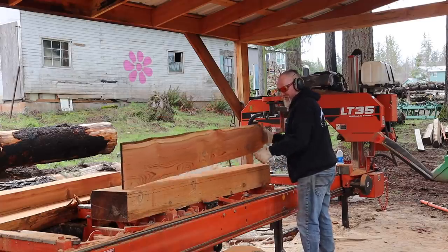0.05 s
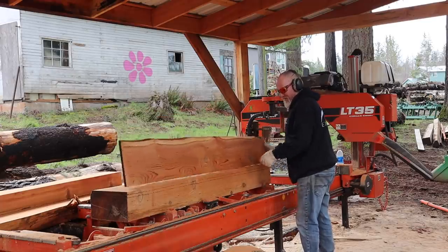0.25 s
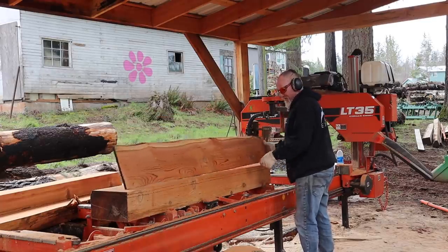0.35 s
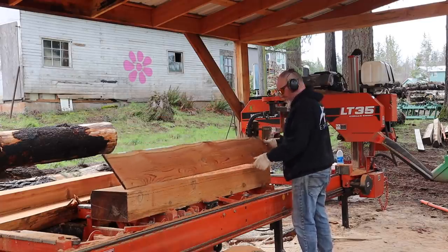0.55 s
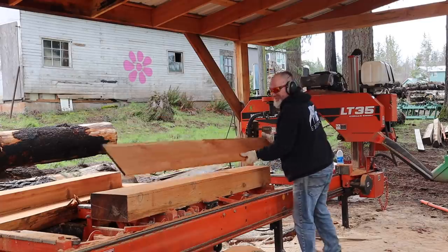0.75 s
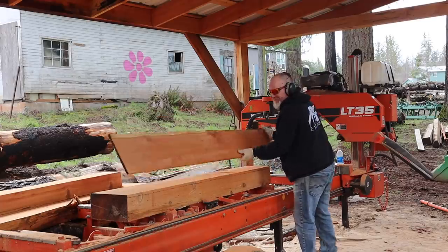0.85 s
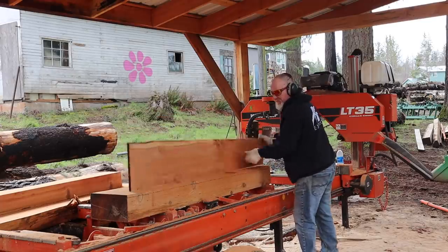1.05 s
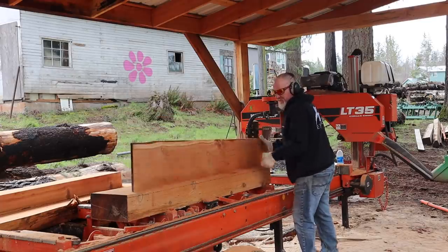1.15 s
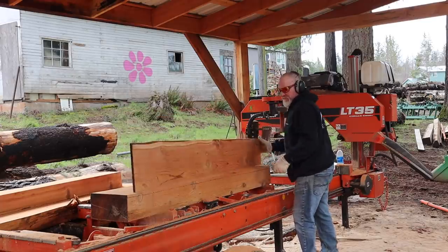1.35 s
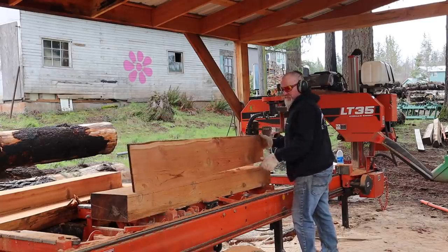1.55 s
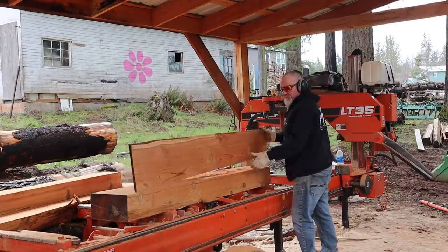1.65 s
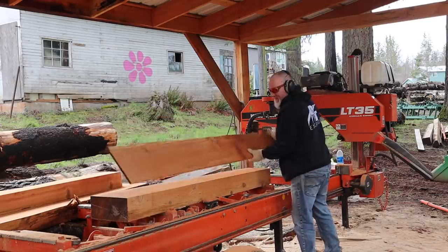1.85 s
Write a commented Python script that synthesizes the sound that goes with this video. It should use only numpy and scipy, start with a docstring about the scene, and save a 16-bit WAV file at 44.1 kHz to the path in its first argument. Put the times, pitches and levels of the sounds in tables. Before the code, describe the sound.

Two hard woody clunks of a thick board landing on timber, with scrapes and rumble between

```python
"""Under an open shed roof, a heavy plank is stood on edge twice on a squared log and shakes the steel bed.
Contact pulses ring the plank's modes, with noise cracks and a diffuse rumble that dies away by frequency.
Gloves and wood scrape as shaped noise and grains; loose steel ticks in noise bands and pings in decaying sines.
A dragging drone, a thin bird twitter, outdoor air and a far wavering hum are filtered noise and a drifting sine.
The loudest peaks clip."""
import sys
import numpy as np
from scipy import signal
from scipy.fft import rfft, irfft, next_fast_len
from scipy.io import wavfile
from scipy.ndimage import map_coordinates

SR = 44100
rng = np.random.default_rng(int(sys.argv[2]) if len(sys.argv) > 2 else 0)


def boost(x):
    """Linear amplitude factor 10**(x/20) for a level x in decibels (scalar or array-like)."""
    u = np.asarray(x, float) / 20
    return 10 ** u


def to_wav(s):
    """Save 16-bit WAV."""
    ch = np.atleast_2d(s).T  # columns
    pcm = np.round(np.clip(ch, -1, 1) * 32767)  # PCM
    wavfile.write(sys.argv[1], SR, pcm.astype(np.int16))


N = 83790  # length in samples


def unit(x):
    """Scale to rms 1."""
    return x / np.sqrt(np.mean(x ** 2) + 1e-20)


def along(points, hz):
    """Interpolate (Hz, value) points on a log frequency axis."""
    f, value = np.transpose(points)
    return np.interp(np.log(hz + 1), np.log(f + 1), value)


def wobble(rate):
    """A smooth random curve with rate knots a second."""
    knots = rng.standard_normal(int(N * rate / SR) + 4)
    return map_coordinates(knots, [np.arange(N) * rate / SR])


def filtered(x, response):
    """Filter x by a response given as a function of frequency."""
    size = next_fast_len(len(x) + 8192)
    spectrum = rfft(x, size) * response(np.fft.rfftfreq(size, 1 / SR))
    return irfft(spectrum, size)[:len(x)]


def narrow(hz, width_hz):
    """Noise in one resonance at rms 1; amplitude is halved at the edges of its width."""
    noise = rng.standard_normal(N)
    return unit(filtered(noise, lambda f: 1 / (1 + (2 * (f - hz) / width_hz) ** 2)))


def stroke(rows):
    """Gain along a (seconds, dB) curve, fading in and out in 4 ms."""
    s, db = np.transpose(rows)
    t = np.arange(N) / SR
    fade = np.clip(np.minimum(t - s[0], s[-1] - t) / .004, 0, 1)
    return boost(np.interp(t, s, db)) * fade


def add(x, s, part):
    """Mix part into x from time s in seconds."""
    seg = x[round(s * SR):][:len(part)]
    seg += part[:len(seg)]


# Contacts of plank and log. Each row: start in seconds, strength in dB before RING_DB, contact in ms,
# pitch factor as held, direction of the push (+1 or -1), crack in dB at its start before its low-pass.
KNOCKS = [(.2220, -20.5, 1.05, 1.08, 1, -47), (0.2243, -14.5, 0.47, 1.012, -1, -25.5),
          (0.2253, -15.5, 0.59, 1.04, -1, -45), (0.2273, -19.5, 0.73, 0.96, -1, -52),
          (0.311, -27.5, 1.9, 1.28, -1, -34), (.3593, -12, 3, .9, -1, -44),
          (0.3861, -17.5, 4.5, .95, -1, -56), (.469, -40, 1.6, .95, 1, -61),
          (1.1430, -11, 0.34, 0.98, 1, -12), (1.147, -21, 0.63, .97, 1, -22.5),
          (1.163, -28.5, .8, 1, 1, -44), (1.231, -24.5, 1.5, 0.95, 1, -48),
          (1.272, -32.5, 0.59, .97, -1, -57)]
# Bending modes of the plank. Each row: frequency in Hz before the pitch factor,
# level in dB before scatter, t60 in seconds.
PLANK = [(122, -12, 0.12), (198, -5, 0.041), (249, -7, 0.048), (323, -17.5, 0.031), (448, 8, 0.03),
         (531, -7, 0.023), (678, -0.5, 0.029), (865, 2, 0.046), (981, -4.5, 0.033), (1382, 3, 0.034),
         (1410, -7.5, .02), (2010, -9.5, 0.015), (2210, -9, 0.012), (2800, -10, .008), (4670, -41, .006)]
RING_DB, MODE_SCATTER_DB = -6.5, 1
CRACK_T60_S = .004


def knocks():
    """A push as long as the contact rings the plank's modes, and hard spots crack."""
    out, t = np.zeros(N), np.arange(SR // 4) / SR
    for s, db, ms, pitch, way, crack_db in KNOCKS:
        push = np.sin(np.pi * np.clip(t[:400] * 1000 / ms, 0, 1)) ** 2
        ring = np.zeros(len(t))
        for hz, mode_db, t60 in PLANK:
            decay = boost(mode_db + MODE_SCATTER_DB * rng.normal() - 60 * t / t60)
            ring += decay * np.sin(2 * np.pi * hz * pitch * t)
        add(out, s, np.sign(way) * boost(db + RING_DB) * np.convolve(ring, push / push.sum()))
        crack = filtered(rng.standard_normal(len(t)), lambda f: 1 / (1 + (f / 4000) ** 2))
        add(out, s, boost(crack_db - 60 * t / CRACK_T60_S) * crack)
    return out


# Colour of the shaking log, bed and roof. Each row: frequency in Hz, relative level in dB.
SHAKE = [(30, -14.5), (100, 14), (240, -5), (450, -2), (900, -4.5), (1300, -13.5), (2200, -21.5),
         (3400, -21.5), (4200, -33), (5200, -30), (7000, -38), (11000, -44.5)]
# How long each frequency shakes. Each row: frequency in Hz, factor on the t60.
SHAKE_LASTS = [(60, 1.8), (250, 1.24), (800, 1.11), (2500, 0.84), (9000, 1.4)]
SHAKE_RISE_S = 0.001
CLATTER_DB, CLATTER_PER_S = 1.04, 120  # depth and knots a second of the level wobble


def shake(t60, dull_hz):
    """Diffuse clattering rumble starting near rms 1, each frequency dying at its own speed."""
    hz, t, z = signal.stft(rng.standard_normal(SR), SR, nperseg=256)
    colour = boost(along(SHAKE, hz)) / np.sqrt(1 + (hz / dull_hz) ** 4)
    colour = colour / np.sqrt(np.mean(colour ** 2))
    decay = boost(-60 * t / (t60 * along(SHAKE_LASTS, hz)[:, None]))
    rumble = signal.istft(z * colour[:, None] * decay, SR, nperseg=256)[1][:SR]
    rise = 1 - np.exp(-np.arange(SR) / SR / SHAKE_RISE_S)
    return rumble * rise * boost(CLATTER_DB * wobble(CLATTER_PER_S)[:SR])


# Rumbles after the landings, and one low handling bump between them. Each row: start in seconds,
# level in dB before radiation, t60 in seconds before the factor by frequency, dull above this many Hz.
SHAKES = [(0.225, -27.5, 0.35, 6000), (.25, -33, 0.64, 1480), (.361, -36.5, 0.16, 1190),
          (.385, -32.5, 0.23, 292), (0.631, -49.5, 0.29, 250), (1.144, -26.5, 0.29, 6000),
          (1.17, -37.5, 0.71, 4000), (1.21, -34, 0.57, 1540)]


def shaking():
    """Log, bed and roof rumble after the landings and at a soft handling bump."""
    out = np.zeros(N)
    for s, db, t60, dull_hz in SHAKES:
        add(out, s, boost(db) * shake(t60, dull_hz))
    return out


RADIATES_HZ = 131


def radiated(x):
    """A damped second-order high-pass: lows radiate weakly."""
    return filtered(x, lambda f: -f * f / (RADIATES_HZ ** 2 - f * f + 1.4j * f * RADIATES_HZ))


# Ticks of loose steel parts. Each row: start in seconds, level in dB at the start, centre in Hz, t60 in seconds.
TICKS = [(0.252, -51, 4000, .03), (0.312, -56, 6800, 0.11), (1.153, -56, 6450, .08),
         (1.201, -61, 7340, 0.15), (1.274, -67, 7200, 0.086), (1.3265, -55.5, 6480, 0.085),
         (1.495, -67, 3450, .04), (1.654, -63, 6100, .008), (1.6825, -57.5, 3700, .04)]
# Rings of small steel parts. Each row: start in seconds, frequency in Hz, peak level in dB before the fade,
# t60 in seconds before the fade.
PINGS = [(.251, 9147, -55, .22), (.251, 9188, -56, .22), (1.327, 4800, -58, .15), (1.327, 5520, -56, .1)]
TICK_OCTAVES = 0.45  # standard deviation of a tick's band


def steel():
    """Loose parts tick as decaying noise bands; small parts ping as decaying sines."""
    out, t = np.zeros(N), np.arange(SR // 2) / SR
    for s, db, hz, t60 in TICKS:
        noise = rng.standard_normal(len(t))
        hiss = filtered(noise, lambda f: np.exp(-(np.log2(f / hz + 1e-9) / TICK_OCTAVES) ** 2 / 2))
        add(out, s, unit(hiss) * boost(db - 60 * t / t60))
    fade = np.cos(np.pi * t) ** 2  # silent after half a second
    for s, hz, db, t60 in PINGS:
        add(out, s, boost(db - 60 * t / t60) * np.sin(2 * np.pi * hz * t) * fade)
    return out


GRAINS_PER_S = 1200


def scrape(rows, spectrum, grain_share):
    """Hiss and random wood-fibre grains, coloured and shaped by a stroke."""
    grains = (rng.random(N) < GRAINS_PER_S / SR) * rng.standard_normal(N) * rng.exponential(size=N)
    rub = grain_share * unit(grains) + (1 - grain_share) * rng.standard_normal(N)
    return stroke(rows) * unit(filtered(rub, lambda f: boost(along(spectrum, f))))


# Scraping strokes of gloves and wood. Each row: time in seconds, level in dB.
STROKE_A = [(.88, -83), (.948, -65), (.97, -65), (1.044, -46.5), (1.072, -51.5), (1.088, -58.5),
            (1.115, -63.5), (1.143, -51.5)]
STROKE_B = [(1.6, -72), (1.608, -70), (1.73, -56.5), (1.738, -54), (1.822, -50.5), (1.828, -39)]
# Their colours. Each row: frequency in Hz, relative density in dB per Hz.
SCRAPE_A = [(290, -32), (500, -4.5), (562, -14), (682, -6), (1050, -8.5), (1110, -8.5), (1660, -5),
            (2940, -9.5), (3350, -6.5), (4280, -18.5), (5000, -15.5), (11000, -38), (14300, -52),
            (22000, -120)]
SCRAPE_B = [(290, -9), (500, -5), (584, -11), (665, -2), (872, -6), (1160, -11), (1410, -10.5),
            (1540, -4.5), (1780, -5), (2050, -8), (2270, -6), (2760, -15.5), (3100, -7), (3810, -10.5),
            (4120, -20), (6640, -24), (11000, -34.5), (14300, -64), (22000, -120)]


def scraping():
    """Gloves and wood rub in two strokes of hiss and grains."""
    return scrape(STROKE_A, SCRAPE_A, 0.29) + scrape(STROKE_B, SCRAPE_B, 0.39)


# The plank's edge grinds as it settles after each of the two landings. Each row: time in seconds, level in dB.
GRIND_A = [(0.25, -56), (0.324, -47.5), (0.354, -56), (0.372, -49.5), (0.386, -57), (0.394, -54),
           (0.5, -75.5)]
GRIND_B = [(1.165, -62), (1.207, -52.5), (1.279, -47), (1.315, -66), (1.331, -50), (1.395, -62.5),
           (1.6, -67.5)]
# Colour of the grinding. Each row: frequency in Hz, relative density in dB per Hz.
GRIND = [(710, -23), (1200, 0), (1260, -5), (2500, -15), (3390, -13.5), (4310, -25), (5440, -20),
         (5910, -34), (8720, -36), (9480, -44), (9750, -49), (11000, -55), (14300, -82), (22000, -120)]


def grinding():
    """The settling edge grinds with a larger share of grains."""
    return scrape(GRIND_A, GRIND, 0.47) + scrape(GRIND_B, GRIND, 0.47)


# The drag of the plank. Each row: time in seconds, gain in dB on the summed resonances.
DRAG = [(1.3, -54), (1.522, -59.5), (1.542, -56), (1.72, -64.5)]
# Its droning resonances. Each row: frequency in Hz, width in Hz, level in dB before the drag gain.
DRONE = [(455.5, 23, -4), (725, 110, 1.5), (2570, 140, -16)]


def drone():
    """The plank drones in narrow noise resonances as it drags."""
    return stroke(DRAG) * sum(boost(db) * narrow(hz, width_hz) for hz, width_hz, db in DRONE)


# Bands of the thin twitter. Each row: frequency in Hz, width in Hz, level in dB before the flutter.
BIRD = [(4700, 430, -72), (5250, 900, -65.5), (5600, 110, -79.5)]
BIRD_S = 1.826  # start


def bird():
    """A thin twitter of narrow fluttering noise bands near 5 kHz."""
    on = np.clip((np.arange(N) / SR - BIRD_S) / 0.0037, 0, 1)
    return on * sum(boost(db + 2.5 * wobble(70)) * narrow(hz, width_hz) for hz, width_hz, db in BIRD)


# Colour of the outdoor air. Each row: frequency in Hz, relative density in dB per Hz.
AIR = [(15, -72), (25, -5), (85, -0.5), (179, -7.5), (232, -11), (307, -8), (406, -17.5), (450, -16),
       (644, -20.5), (970, -13), (1160, -23), (9460, -41.5), (11300, -37.5), (14700, -78), (22000, -120)]
AIR_DB = -56  # before the bass lumps
BASS_LUMPS_DB, BASS_LUMPS_PER_S = 1.8, 16  # depth and knots a second


def outdoor_air():
    """Coloured noise whose bass swells and dips at random."""
    air = unit(filtered(rng.standard_normal(N), lambda f: boost(along(AIR, f))))
    bass = filtered(air, lambda f: 1 / (1 + (f / 350) ** 4))
    lumps = boost(BASS_LUMPS_DB * wobble(BASS_LUMPS_PER_S))
    return boost(AIR_DB) * (air - bass + bass * lumps)


# The hum wavers. Each row: time in seconds, level in dB before the fast wobble.
HUM = [(0, -70.5), (.15, -55), (.55, -61), (.7, -62), (.8, -69), (1.0, -59), (1.14, -58), (1.4, -62),
       (1.5, -52.5), (1.65, -64.5), (1.78, -63), (1.9, -75)]
HUM_HZ, HUM_WIDTH_HZ = 120, 4  # centre and depth of the pitch wobble


def far_hum():
    """A sine drifting at random in pitch and level."""
    pitch_hz = HUM_HZ + HUM_WIDTH_HZ * wobble(11.8)
    tone = unit(np.sin(2 * np.pi * np.cumsum(pitch_hz) / SR))
    return stroke(HUM) * tone * boost(1.8 * wobble(18))


def scene():
    """All sources, mono."""
    plank = radiated(knocks() + shaking())
    rub = scraping() + grinding() + drone()
    return (plank + steel() + rub + bird() + outdoor_air() + far_hum())[None]


CLIP_TOP, CLIP_HARD = .21, 8  # ceiling in amplitude, sharpness of the knee
TOP_HZ = 10710


def low_pass(x):
    """Removes everything above the highest recorded frequency."""
    return signal.sosfilt(signal.butter(12, 11460, fs=SR, output="sos"), x)


def record(dry):
    """Peaks bend into a ceiling and the top band is cut steeply."""
    clipped = dry / (1 + np.abs(dry / CLIP_TOP) ** CLIP_HARD) ** (1 / CLIP_HARD)
    mix = filtered(clipped[0], lambda f: 1 / (1 + (f / TOP_HZ) ** 40))[None]
    return low_pass(mix)


dry = scene()
out = record(dry)
to_wav(out)
```